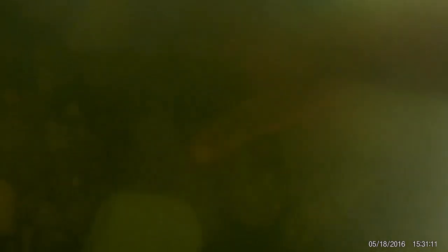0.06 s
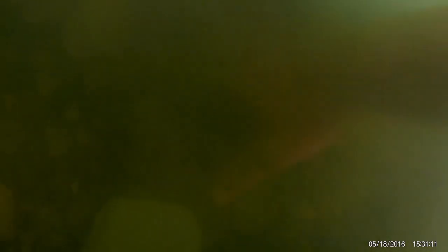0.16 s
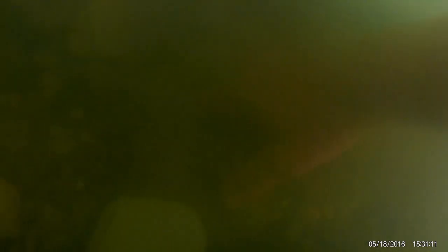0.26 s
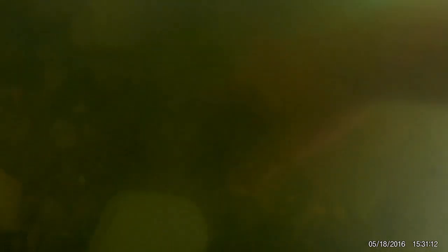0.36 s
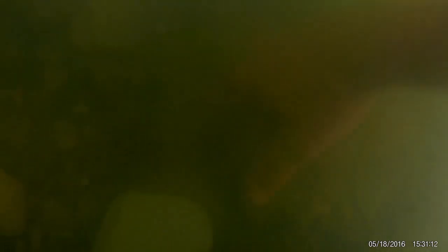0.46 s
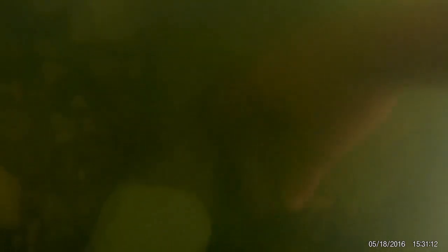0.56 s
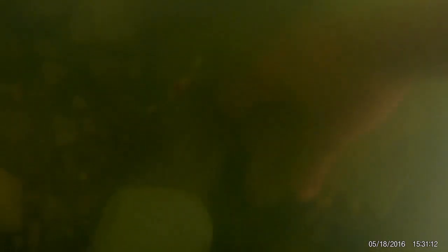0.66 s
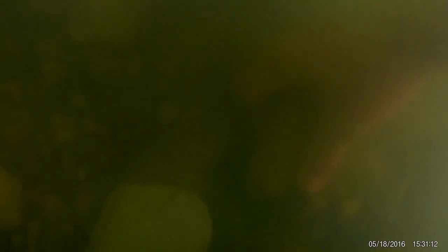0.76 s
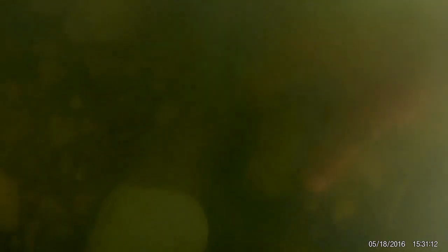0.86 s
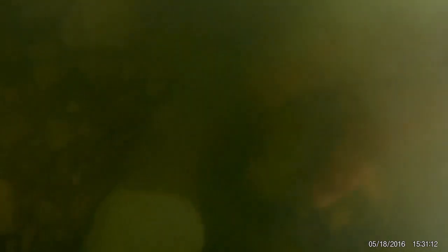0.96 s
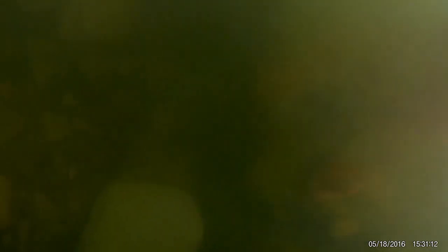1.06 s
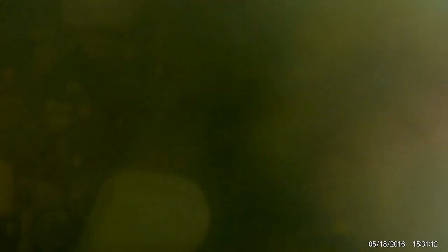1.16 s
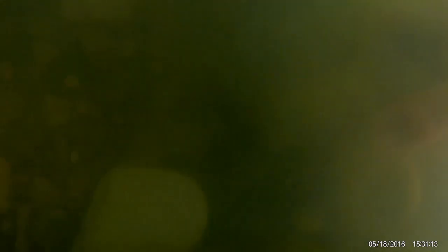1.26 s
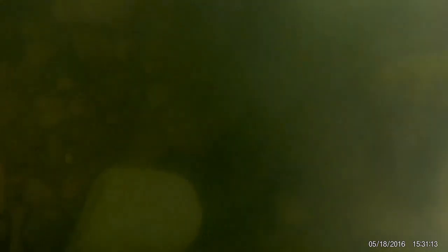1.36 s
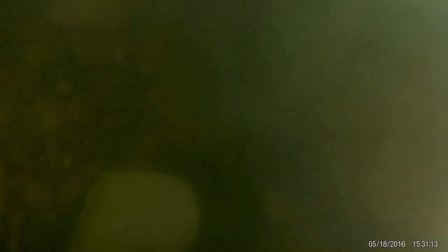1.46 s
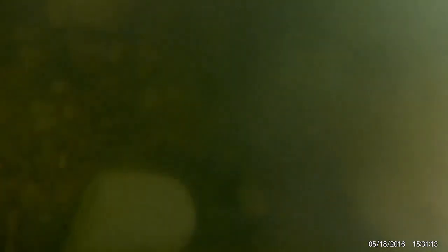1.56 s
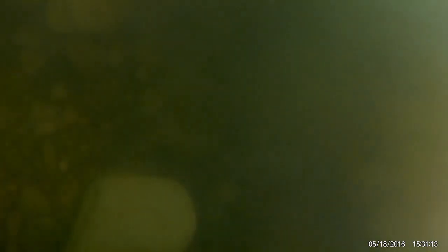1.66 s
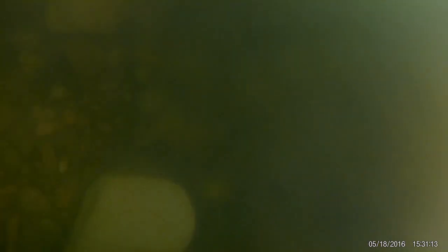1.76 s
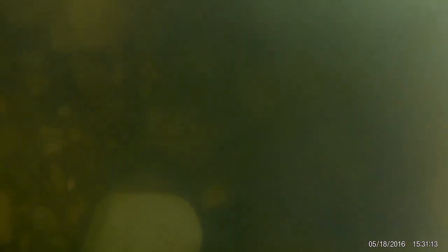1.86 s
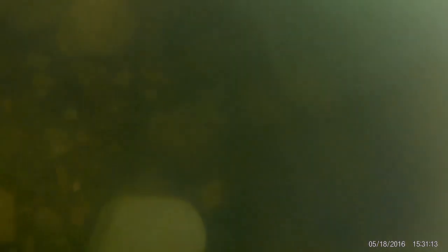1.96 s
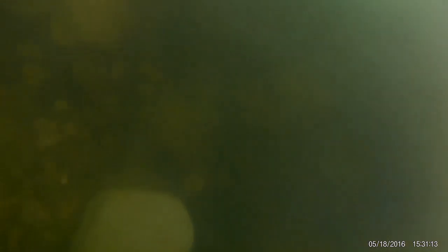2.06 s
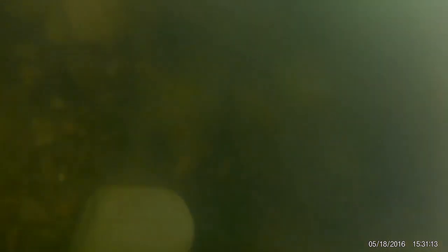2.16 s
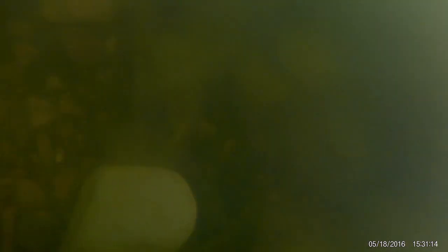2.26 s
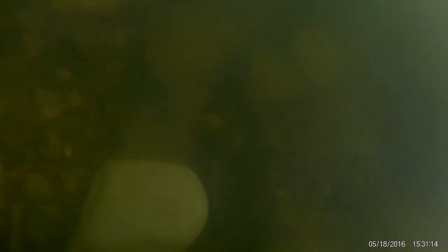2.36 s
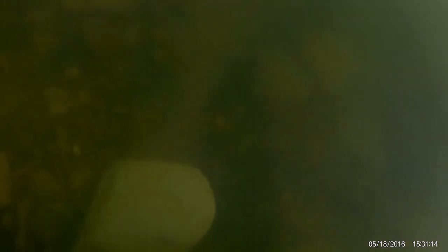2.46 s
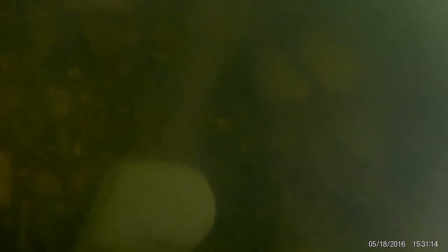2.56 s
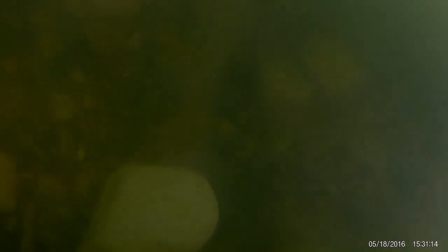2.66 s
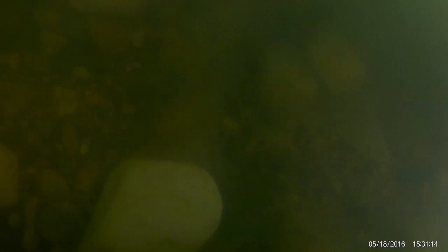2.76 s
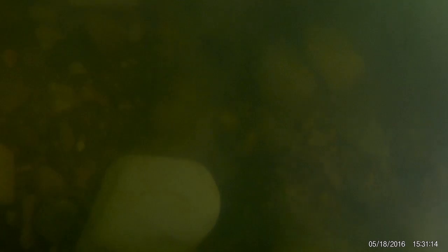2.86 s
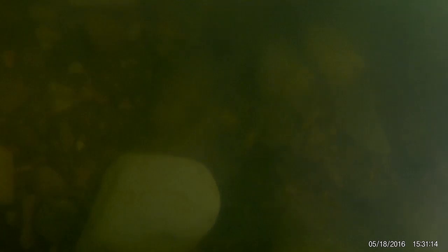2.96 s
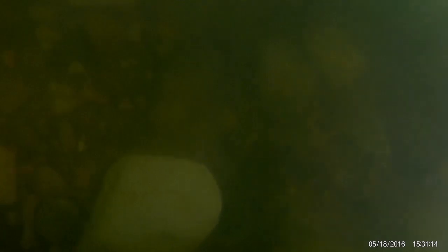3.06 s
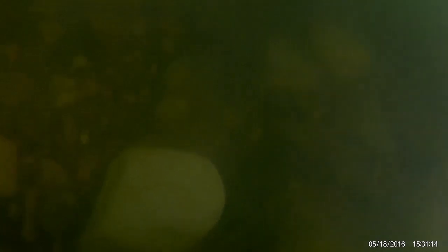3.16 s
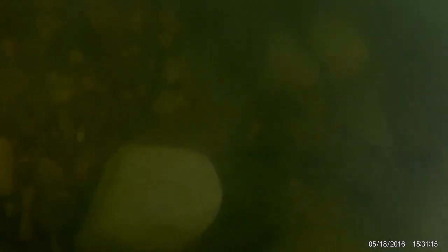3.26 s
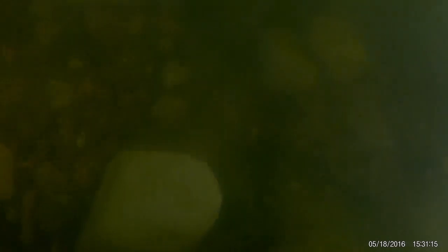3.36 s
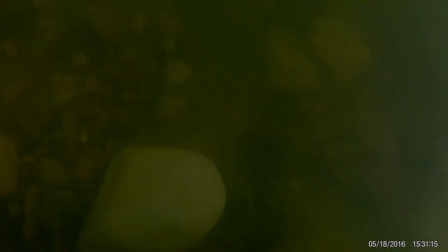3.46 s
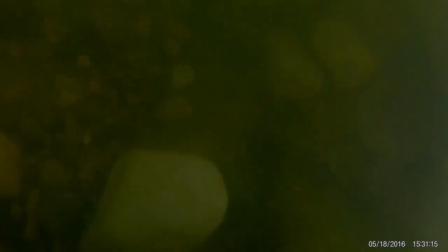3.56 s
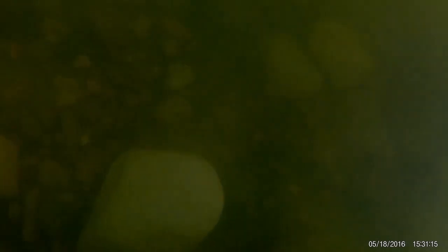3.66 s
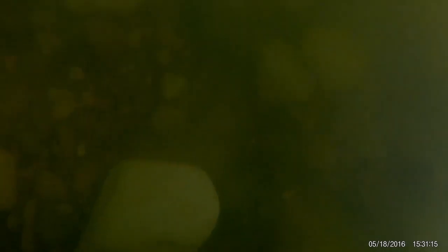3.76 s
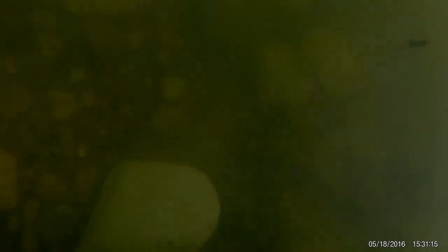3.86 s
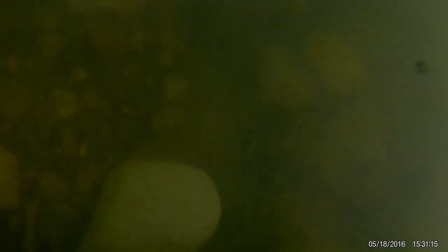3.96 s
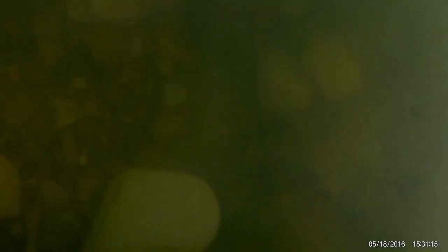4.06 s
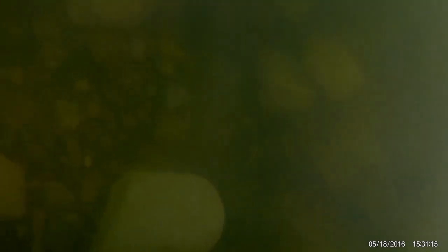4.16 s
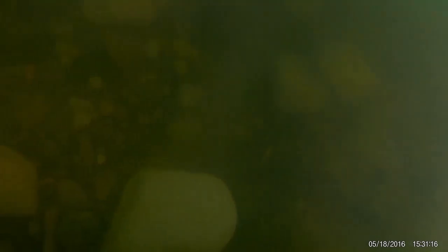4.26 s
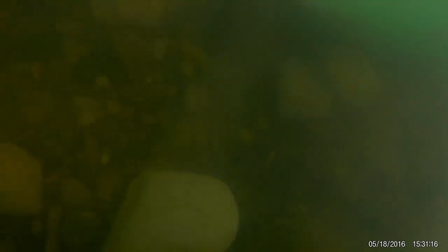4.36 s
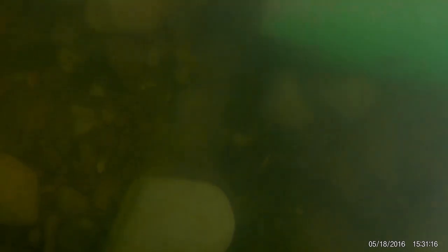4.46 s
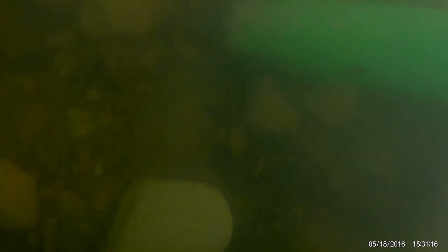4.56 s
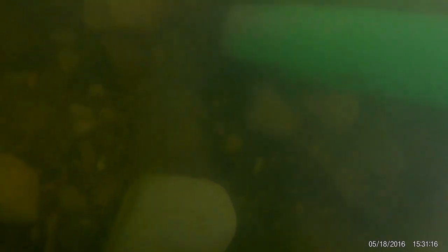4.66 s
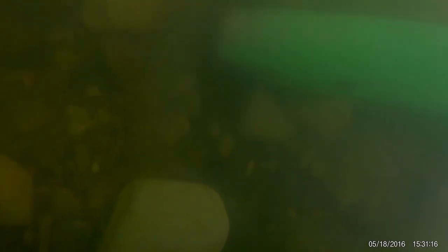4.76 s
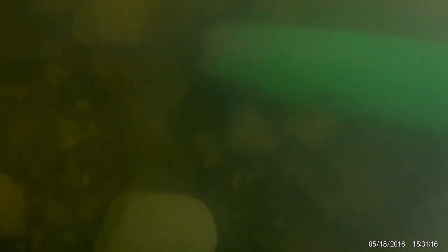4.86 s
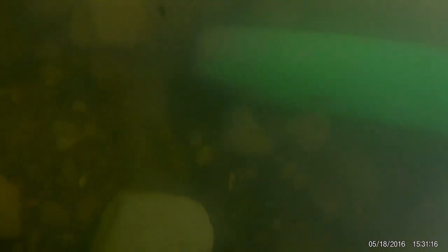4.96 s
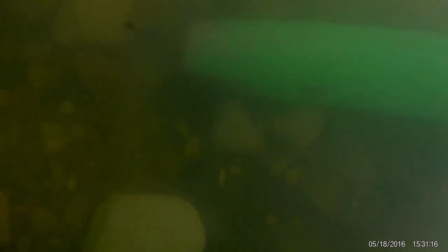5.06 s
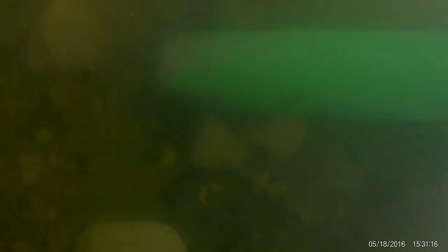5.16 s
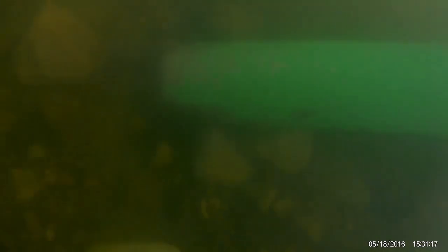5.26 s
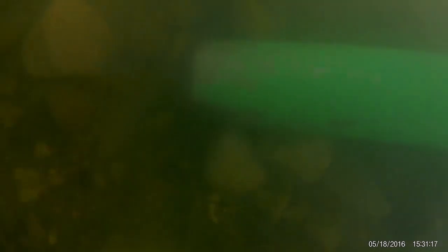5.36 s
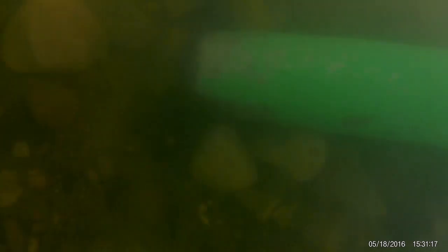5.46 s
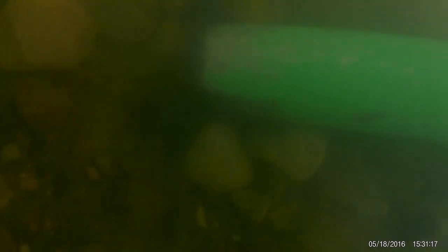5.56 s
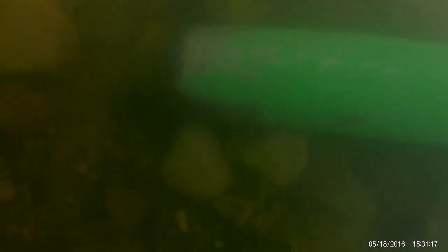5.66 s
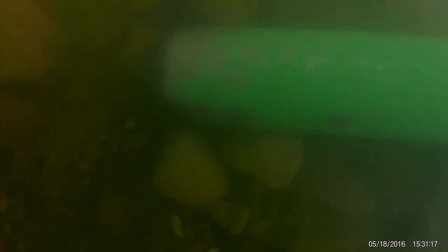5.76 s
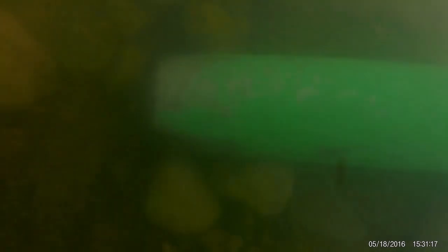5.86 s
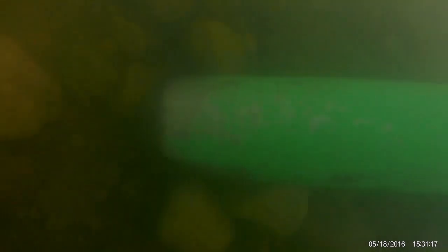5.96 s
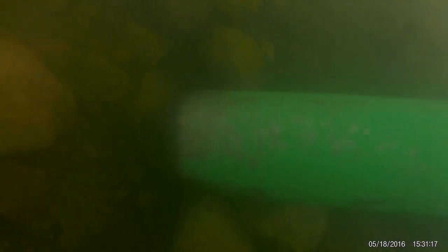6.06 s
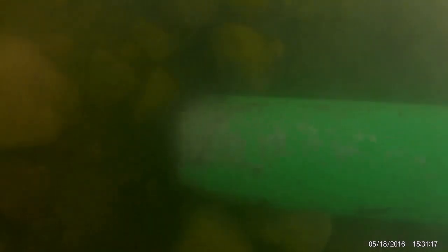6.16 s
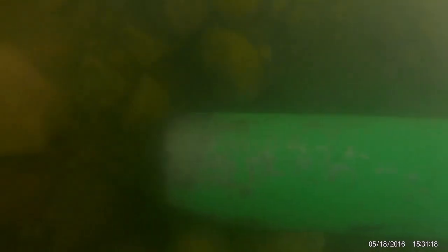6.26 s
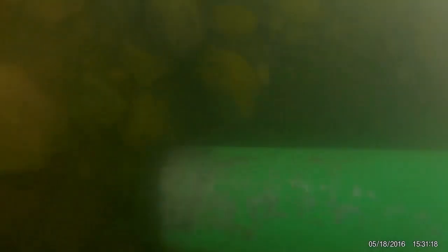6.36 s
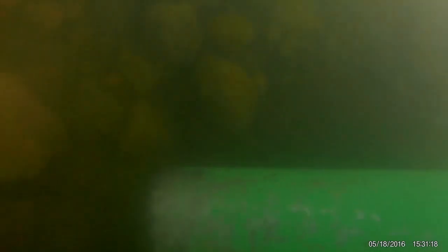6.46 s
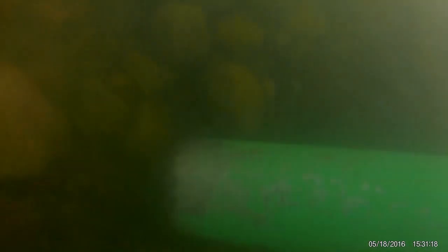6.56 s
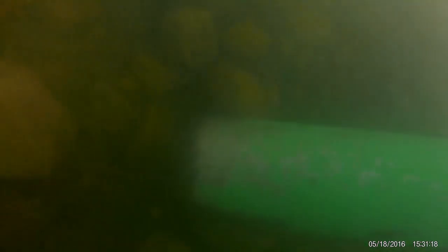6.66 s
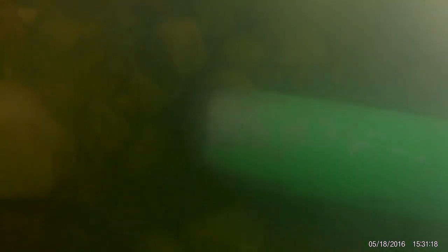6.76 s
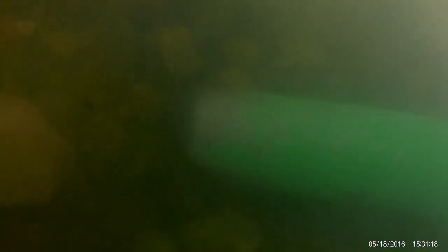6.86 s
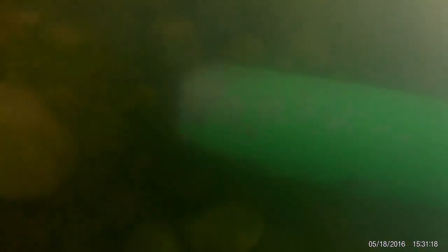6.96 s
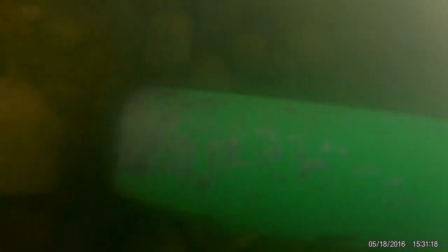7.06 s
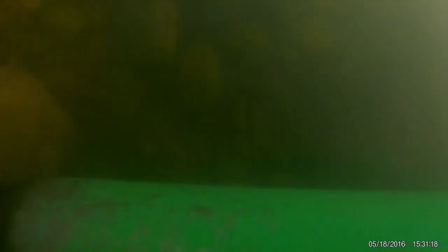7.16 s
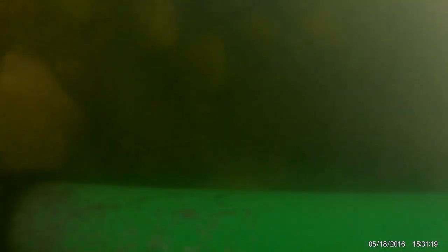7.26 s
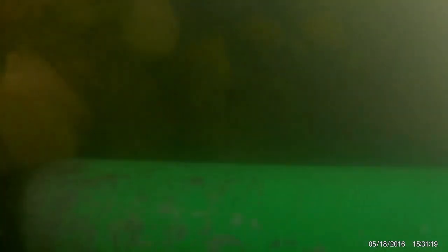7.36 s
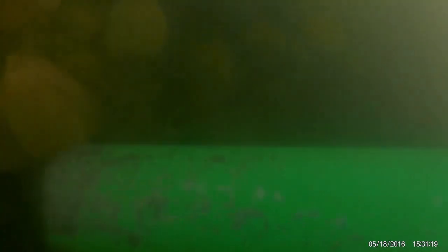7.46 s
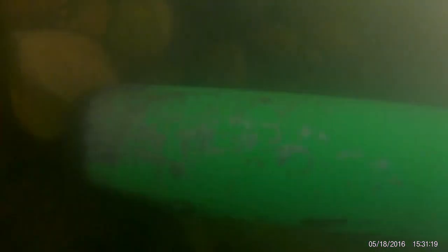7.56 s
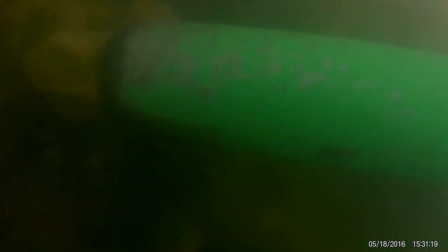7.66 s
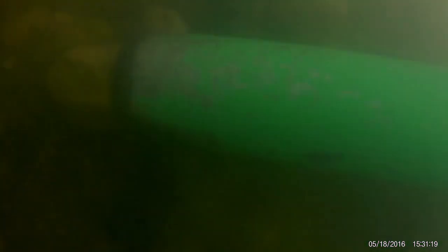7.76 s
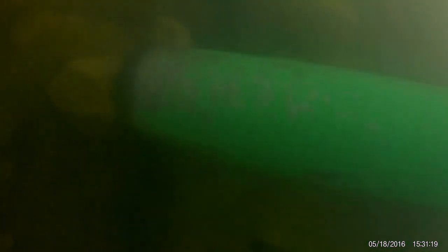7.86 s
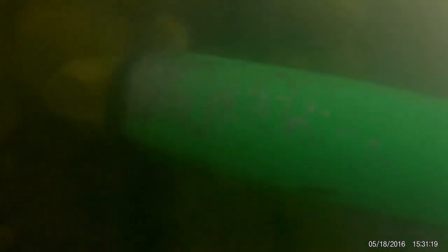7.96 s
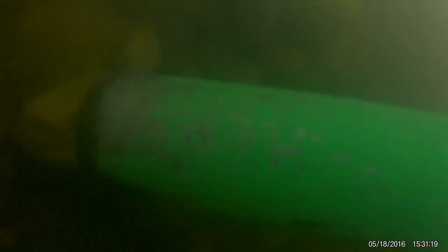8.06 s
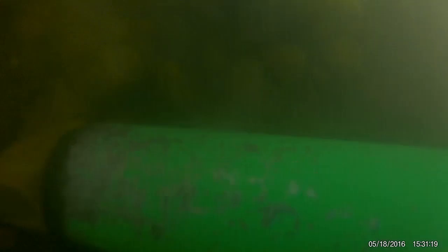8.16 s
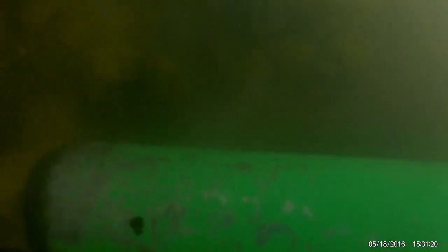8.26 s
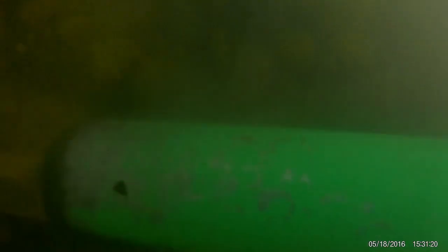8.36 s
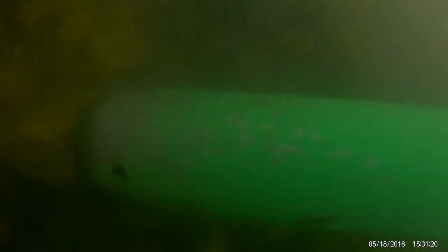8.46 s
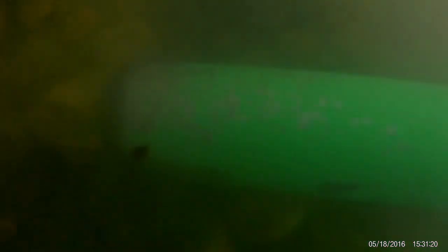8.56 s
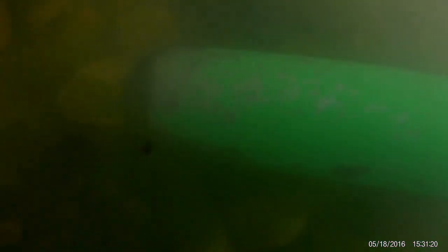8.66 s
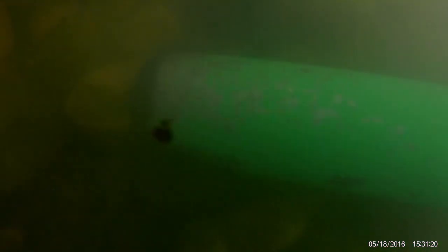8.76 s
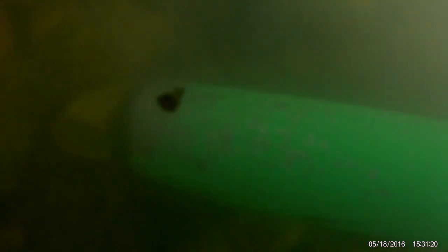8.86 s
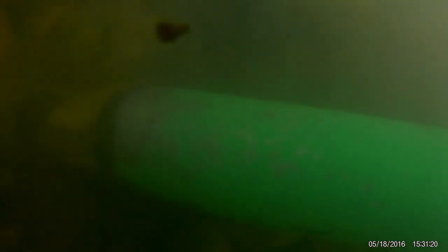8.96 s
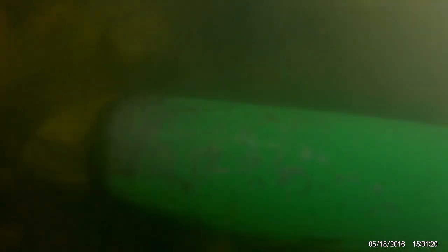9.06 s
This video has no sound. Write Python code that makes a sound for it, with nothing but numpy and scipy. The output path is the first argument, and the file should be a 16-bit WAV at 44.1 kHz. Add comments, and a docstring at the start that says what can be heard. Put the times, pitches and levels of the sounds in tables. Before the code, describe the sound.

Underwater pump engine drones with faint sloshing and clicks, then stones and gravel suddenly clatter loudly through a booming hollow hose before dulling.

```python
"""A suction dredge works a river bed, heard under water from inside a camera housing.
First the pump engine drones, water sloshes and gulps, grit ticks, a few pebbles click and faint moans sing.
At 4.4 s the nozzle bites into gravel: stones knock along the hose and set the housing ringing, over a
patter of pebbles and crackling sand. The hose booms near 680 Hz, loudest around 7.3 s, and the hardest
blows overload the microphone; towards the end the rush slackens and dulls."""
import sys
import numpy as np
from scipy import signal
from scipy.fft import rfft, irfft, next_fast_len
from scipy.io import wavfile
from scipy.ndimage import map_coordinates

SR = 44100
rng = np.random.default_rng(int(sys.argv[2]) if len(sys.argv) > 2 else 0)


def waveform_to_disk(signal):
    """Save audio, clipped to [-1, 1], as 16-bit WAV at the path in sys.argv[1]."""
    frames = np.transpose(np.atleast_2d(signal))
    scaled = np.clip(frames, -1, 1) * 32767
    samples = np.round(scaled).astype(np.int16)
    wavfile.write(sys.argv[1], SR, samples)


N = 402191
TIME = np.arange(N) / SR
ENGINE_HZ = 52.3

# Hardness of the gravel, high = sharp. Each row: time in seconds, clack level in dB.
GRAVEL_HARDNESS_CURVE = [(4.42, -9.5), (4.85, 8), (5.7, 2.5), (6.35, 2.5), (6.8, -9.5), (7.45, 0),
                         (8.0, -5.5), (8.35, -5), (8.75, -13)]
# Spectrum of turbulent water. Each row: frequency in Hz, relative density in dB per Hz.
TURBULENCE_SPECTRUM = [(20, -9), (50, -3), (125, 1), (190, -2), (255, 2), (380, -5), (800, -15),
                       (2000, -45), (16000, -100)]
# The nozzle swings in between these two times, in seconds.
NOZZLE_SWING_S = [4.2, 5.44]


def from_db(db):
    """Decibels to gain."""
    return 10 ** (np.asarray(db) / 20)


def rms_one(x):
    """Scale to unit rms."""
    return x / np.sqrt(np.mean(x ** 2) + 1e-20)


def curve(rows):
    """Interpolate (seconds, value) rows at every sample."""
    s, value = np.transpose(rows)
    return np.interp(TIME, s, value)


def butter(x, hz, kind, order=2):
    """Causal Butterworth filter."""
    return signal.sosfilt(signal.butter(order, hz, kind, fs=SR, output="sos"), x)


def drift(rate_hz):
    """Smooth random curve of spread about 1 through rate_hz random knots a second."""
    knots = rng.standard_normal(4000)
    return map_coordinates(knots, [TIME * rate_hz], order=2, mode="wrap")


def noise(spectrum):
    """Noise with the given spectrum; rms 1."""
    hz, db = np.transpose(spectrum)
    size = next_fast_len(N)
    bins_hz = np.maximum(np.fft.rfftfreq(size, 1 / SR), 1)
    gain = from_db(np.interp(np.log(bins_hz), np.log(hz), db))
    white = rng.standard_normal(size)
    return rms_one(irfft(rfft(white) * gain)[:N])


def ring(force, hz, t60_s):
    """Damped resonator: a unit click sets off a sine that starts at height 1."""
    radius = from_db(-60 / (t60_s * SR))
    w = 2 * np.pi * hz / SR
    return signal.lfilter([0, np.sin(w)], [1, -2 * radius * np.cos(w), radius ** 2], force + 1e-18)


def swell(middle_s, half_s):
    """A bell-shaped rise and fall."""
    return np.exp(-.5 * np.minimum(((TIME - middle_s) / half_s) ** 2, 100))


def nozzle_nearness():
    """0 while the nozzle is far, rising to 1 as it swings in."""
    return np.interp(TIME, NOZZLE_SWING_S, [0, 1])


def contact(size, scatter, scatter_s, tail, tail_s):
    """One sharp touch, its reflections close by, then a faint rattle along the hose."""
    age_s = np.arange(size) / SR
    envelope = scatter * np.exp(-age_s / scatter_s) + tail * np.exp(-age_s / tail_s)
    force = envelope * rng.standard_normal(size)
    force[0] += 1
    return force


def housing(force):
    """Modes ring in parallel; some bass passes straight through the wall, which is deaf to one treble band."""
    # Resonances of hose and housing. Each row: frequency in Hz, width in Hz, peak gain in dB.
    modes = [(680, 107.8, 3), (942, 438, -3.5), (1108, 127, -0.5), (1739.4, 160, 0), (1825, 243, -4),
             (1923, 50, -5.5), (2248, 197, -17.5), (3188, 170, -15.5), (3900, 51, -20.5), (4104, 86, -25),
             (5304, 380, -40), (5680, 180, -43), (6580, 1180, -35.5), (9000, 1370, -45),
             (10850, 1070, -48.5), (13900, 710, -62)]
    out = from_db(-34) * butter(force, 750, "low")
    for k, (hz, width_hz, db) in enumerate(modes):
        mode = ring(force, hz, np.log(1000) / (np.pi * width_hz))
        sign = (-1) ** k
        out = out + sign * from_db(db) * 2 * np.pi * width_hz / SR * mode
    return signal.lfilter(*signal.iirnotch(8000, 3, fs=SR), out)


def registers(x):
    """Split into thud, clack and tick."""
    thud = butter(x, 1350, "low", order=5)
    clack = butter(x, [1450, 2700], "band", order=3)
    tick = butter(x, 2900, "high", order=5)
    return [thud, clack, tick]


def approach(x, far_hz):
    """Stones sound duller until the nozzle swings close."""
    near = nozzle_nearness()
    return near * x + (1 - near) * butter(x, far_hz, "low", order=3)


def knocks():
    """Big stones thud; the harder the contact, the more of the blow goes into clack and tick."""
    # Clearest strikes. Each row: start in seconds, level in dB, hardness as clack above thud in dB.
    strikes = [(0.069, -40.5, -2), (.328, -36, 3), (.517, -32, -1), (.679, -34, -9), (1.022, -35, -18),
               (1.16, -35, -15.5), (1.378, -33, -1), (1.681, -35.5, -26), (2.131, -23, -8),
               (2.416, -27.5, 8), (2.43, -34.5, 5), (2.45, -33, -5), (2.469, -26, 4), (2.491, -30.5, 6),
               (2.551, -34, -5.5), (3.262, -37, -4), (4.129, -38.5, -6), (4.395, -17, 0.5),
               (4.454, -15.5, -6.5), (4.559, -19.5, -18), (4.728, -7.5, -13), (4.741, -7.5, -2.5),
               (4.781, -6.5, -4), (4.824, -11, -12), (4.836, -10, 0.5), (4.857, -9.5, -31), (4.91, -6, -13),
               (4.943, -8.5, 2), (4.967, -19, -1), (4.984, -8, 3), (5, -5, 3), (5.052, -11, 1),
               (5.062, -12, 5), (5.124, -19, 6), (5.202, -13, 5), (5.291, -14, -14), (5.325, -17, -5),
               (5.356, -17.5, 5), (5.39, -21, -1), (5.416, -5.5, -7), (5.435, -1, -11), (5.46, -7, 4),
               (5.553, -16.5, 15), (5.571, -9.5, 5.5), (5.636, -7.5, -1.5), (5.69, -14.5, -16),
               (5.787, -28, 3), (5.8, -6, 7), (5.829, -17, 5), (5.861, -13.5, -5.5), (5.938, -15, 2.5),
               (6.102, -18.5, 3.5), (6.158, -12.5, -1.5), (6.287, -20.5, 6), (6.312, -6, -6),
               (6.344, -19.5, 13), (6.417, -11.5, 6.5), (6.446, -19, 9), (6.524, -18.5, 11),
               (6.596, -13, 1.5), (6.627, -8.5, -17.5), (6.699, -23, 14), (6.761, -6.5, -15.5),
               (6.873, -8.5, -14), (7.061, -13.5, -9), (7.071, -15, 7), (7.206, -1, -3.5),
               (7.315, -9, -0.5), (7.355, -11, -1), (7.395, -6, 5), (7.433, -1, -17), (7.464, -8, 19),
               (7.638, -6, 1), (7.66, -0.5, -2.5), (7.712, -2.5, 0), (7.724, 2.5, -28), (7.753, -9, -18),
               (7.841, -13, 1), (7.969, -6.5, -35), (8.105, -11, -21), (8.141, -15.5, 3),
               (8.214, -10.5, -39), (8.285, -6.5, -42), (8.299, -7, -12), (8.327, -12, -12),
               (8.486, -13, -30), (8.637, -15, -33), (8.84, -22.5, -6.5), (8.963, -20, -41),
               (9.053, -21, -6)]
    tick_db, tick_per_hardness = -9, 0.86  # tick above thud at hardness 0; dB more per dB of hardness
    size, head = SR // 8, SR // 100
    forces = np.array([contact(size, scatter=0.083, scatter_s=0.0044, tail=0.0061, tail_s=0.018)
                       for _ in strikes])
    parts = np.array(registers(housing(forces)))
    out = np.zeros(N + size)
    for k, (start_s, db, hardness_db) in enumerate(strikes):
        shares = from_db([0, hardness_db, tick_db + tick_per_hardness * hardness_db])
        levels = from_db(db) * shares / np.linalg.norm(shares)
        head_rms = np.sqrt(np.mean(parts[:, k, :head] ** 2, axis=1))
        at = round(start_s * SR)
        out[at:at + size] += levels / head_rms @ parts[:, k]
    return approach(out[:N], far_hz=5100)


def grains(per_s, spread_db, sand_rms, scatter_s):
    """Pebbles of uneven size touch at random over a hiss of sand, coloured by the housing; registers of rms 1."""
    sizes = from_db(spread_db * np.minimum(rng.exponential(1, N), 3.2))
    energy = (rng.random(N) < per_s / SR) * sizes ** 2
    energy = signal.lfilter([1], [1, -np.exp(-1 / (scatter_s * SR))], energy + 1e-18)
    force = np.sqrt(energy / energy.mean() + sand_rms ** 2) * rng.standard_normal(N)
    return [rms_one(part) for part in registers(housing(force))]


def gurgle(per_s, cycles, low_hz, high_hz, count=18):
    """Small air pockets burst at random, each ringing for a few cycles at one of count pitches; rms 1."""
    bursts = (rng.random(N) < per_s / SR) * rng.standard_normal(N)
    dealt = rng.integers(0, count, N)
    pitches_hz = np.geomspace(low_hz, high_hz, count)
    return rms_one(sum(ring(bursts * (dealt == k), hz, cycles / hz) * hz
                       for k, hz in enumerate(pitches_hz)))


def gravel():
    """The rush through the hose: a dense patter of pebbles, with eddies and air that grow with the load."""
    # Gravel running through the hose. Each row: time in seconds, load in dB.
    load_rows = [(4.42, -31), (4.68, -36), (4.85, -28.5), (5.2, -28.5), (5.33, -45.5), (5.62, -29.5),
                 (5.82, -42), (6.2, -41), (6.75, -29), (6.95, -31.5), (7.2, -21), (7.42, -19), (7.74, -18),
                 (7.9, -28), (8.06, -22), (8.64, -23), (8.78, -32.5), (8.93, -27.5), (9.1, -36.5)]
    start_s = 4.394
    hardness_db = curve(GRAVEL_HARDNESS_CURVE)
    thud, clack, tick = grains(per_s=300, spread_db=8.0, sand_rms=0.36, scatter_s=0.0028)
    stones = from_db(3.5) * thud + from_db(hardness_db) * clack
    stones += from_db(-7 + 0.97 * hardness_db) * butter(tick, 11000, "low", order=1)
    eddies = from_db(-14 + 0.46 * drift(61)) * noise(TURBULENCE_SPECTRUM)
    air = from_db(-7) * gurgle(per_s=160, cycles=32.0, low_hz=243.4, high_hz=1232)
    return from_db(curve(load_rows)) * (stones + eddies + air) * (TIME > start_s)


def booms():
    """Hollow booms of the hose, and a few bubbles early on, each ring down at one pitch; high ones die sooner."""
    # Each row: start in seconds, pitch in Hz, height in dB.
    boom_rows = [(.157, 560, -30), (2.176, 211, -28), (2.295, 428, -22), (2.808, 787, -30),
                 (2.947, 637, -12), (3.122, 668, -31), (4.488, 603, -15.5), (5.416, 687, -3.5),
                 (6.309, 711, 1.5), (6.561, 656, 8.5), (7.135, 700, -3), (7.206, 728, 10),
                 (7.223, 686, 15.5), (7.256, 702, 12), (7.314, 641, 6.5), (7.379, 680, 12.5),
                 (7.452, 680, 2), (7.576, 607, 1.5), (7.641, 622, 2.5), (7.723, 626, 4), (8.099, 657, -6)]
    cycles_at_0_db, halving_db = 39, 51  # cycles to -60 dB; this much more height halves them
    age_s = np.arange(SR // 2) / SR
    out = np.zeros(N + len(age_s))
    for start_s, hz, height_db in boom_rows:
        t60_s = cycles_at_0_db * .5 ** (height_db / halving_db) / hz
        envelope = (1 - np.exp(-age_s / 0.00084)) * np.exp(-np.log(1000) * age_s / t60_s)
        at = round(start_s * SR)
        out[at:at + len(age_s)] += from_db(height_db) * envelope * np.sin(2 * np.pi * hz * age_s)
    return out[:N]


def sand():
    """Fine sand crackles in the hose once the nozzle is close, and thins out as the gravel gets coarser."""
    _, _, tick = grains(per_s=220, spread_db=9.5, sand_rms=0.18, scatter_s=0.0013)
    level = from_db(-48.5 + curve(GRAVEL_HARDNESS_CURVE)) * nozzle_nearness()
    return level * rms_one(butter(tick, [4500, 13000], "band"))


def grit():
    """Tiny hard grains tick on the housing; only its upper modes are kept."""
    # Ticks before the nozzle bites. Each row: start in seconds, relative peak in dB.
    touches = [(0.414, -34), (0.7801, -38.5), (1.3352, -33.5), (2.0835, -35), (2.3805, -39), (3.1695, -37),
               (3.3044, -35.5), (3.5436, -35), (3.6958, -37)]
    size = SR // 8
    out = np.zeros(N + size)
    for start_s, db in touches:
        force = contact(size, scatter=.06, scatter_s=0.0029, tail=.003, tail_s=.01)
        tick = butter(housing(force), [3000, 7500], "band")
        at = round(start_s * SR)
        out[at:at + size] += from_db(db - 2) * tick / np.abs(tick).max()
    return out[:N]


def gulps():
    """Short surges of low turbulence as water gulps through the nozzle."""
    # Each row: middle in seconds, half length in seconds, relative level in dB.
    surges = [(1.028, 0.0045, -30), (1.164, 0.0052, -29.5), (6.625, 0.013, -24.5), (6.78, .035, -27.5),
              (6.908, 0.011, -26.5), (7.008, 0.021, -31), (7.241, 0.015, -7.5), (7.66, 0.013, -26),
              (7.712, 0.014, -12.5), (8.086, 0.036, -21.5), (8.683, 0.016, -24), (8.947, 0.026, -28.5)]
    surge = sum(from_db(db) * swell(middle_s, half_s) for middle_s, half_s, db in surges)
    return surge * from_db(0.5 * drift(77)) * noise(TURBULENCE_SPECTRUM)


def moans():
    """Eddies shed at the nozzle rim give faint, rough tones that glide in pitch."""
    # Each row: middle in seconds, half length in seconds, pitch at the middle in Hz, glide in Hz per s,
    # level in dB, roughness (clipped to 0-1).
    tones = [(2.577, 0.25, 447, 562, -46.5, 1.2), (3.768, 0.23, 332.5, -35, -50, 0.8),
             (3.988, 0.038, 692, 0, -31, 0.33)]
    out = np.zeros(N)
    flutter = drift(55) + 1j * drift(55)
    for middle_s, half_s, hz, glide_hz_per_s, db, rough in tones:
        age_s = TIME - middle_s
        turns = hz * age_s + glide_hz_per_s * age_s ** 2 / 2
        rough = np.clip(rough, 0, 1)
        tone = np.real((1 - rough + rough * flutter) * np.exp(2j * np.pi * turns))
        out += from_db(db) * swell(middle_s, half_s) * tone
    return out


def throb():
    """The pump pushes the water once a turn, harder on every second turn; a signed swing of rms 1."""
    return rms_one(np.cos(2 * np.pi * ENGINE_HZ * TIME) + np.cos(np.pi * ENGINE_HZ * TIME))


def water():
    """Lumpy, bubbly sloshing lifts a trickle of sand, over the throbbing hiss of water in the hose."""
    # Water stirred about the nozzle. Each row: time in seconds, relative level in dB.
    slosh_rows = [(0, -56.5), (.3, -42), (.55, -50.5), (.72, -43.5), (1.08, -47.5), (1.27, -54.5),
                  (2.08, -55), (2.22, -40), (2.64, -55), (3.3, -58), (4.4, -63)]
    # Spectra of sloshing and of hiss. Each row: frequency in Hz, relative density in dB per Hz.
    slosh_spectrum = [(40, 6), (110, 3), (250, -1.5), (450, 2), (720, 3.5), (1300, -23), (2500, -54),
                      (16000, -71)]
    hiss_spectrum = [(20, -14), (120, -23.5), (340, -24), (580, -19.5), (730, -17.5), (950, -31.5),
                     (1480, -34), (1740, -33.5), (2100, -71), (2700, -47.5), (3200, -31), (3700, -64.5),
                     (7500, -54), (16000, -68)]
    slosh_db = curve(slosh_rows)
    lumps = from_db(0.5 + 6.3 * drift(60)) * noise(slosh_spectrum)
    air = from_db(-6) * gurgle(per_s=150, cycles=5.6, low_hz=117, high_hz=735)
    thud, clack, tick = grains(per_s=18, spread_db=3.5, sand_rms=1.1, scatter_s=.0015)
    trickle = from_db(-61) * thud + from_db(-66) * clack + from_db(-73) * tick
    stirred = from_db(0.45 * (slosh_db - np.median(slosh_db)))
    hiss = from_db(-52) * throb() * noise(hiss_spectrum)
    return from_db(slosh_db) * (lumps + air) + stirred * trickle + hiss


def engine():
    """Only the firing rate of the pump engine carries down through the water, a nearly steady drone."""
    turns = np.cumsum(ENGINE_HZ * (1 + .006 * drift(7))) / SR
    return from_db(-43.5 + .7 * drift(12)) * np.sin(2 * np.pi * turns)


def scene():
    """Everything reaches the one microphone in the housing."""
    stones = knocks() + gravel() + booms() + sand() + grit()
    flow = gulps() + moans() + water()
    return (stones + flow + engine())[None]


def record(dry):
    """Hard blows flatten near full scale; the recorder has a dip in the treble; the top is cut."""
    overloaded = dry / (1 + dry ** 6) ** (1 / 6)
    dipped = signal.lfilter(*signal.iirnotch(8000, 9, fs=SR), overloaded)
    top_cut = signal.cheby2(12, 70, 17500, fs=SR, output="sos")  # 70 dB down from 17500 Hz up
    return signal.sosfilt(top_cut, .93 * dipped)


dry = scene()
out = record(dry)
waveform_to_disk(out)
```